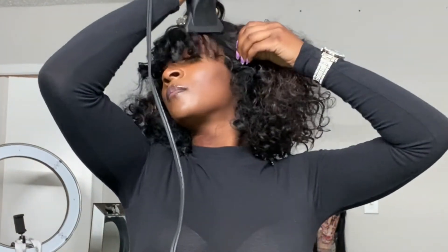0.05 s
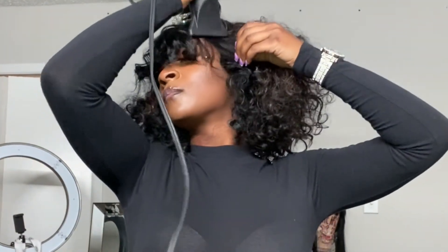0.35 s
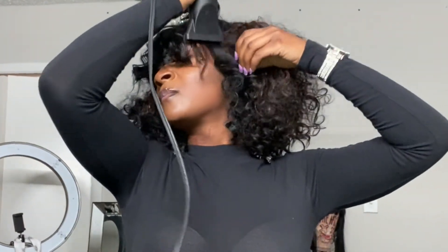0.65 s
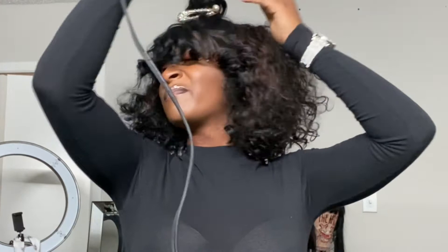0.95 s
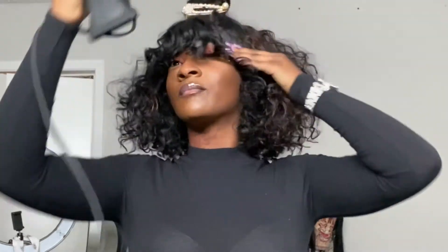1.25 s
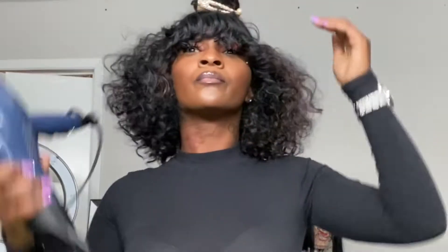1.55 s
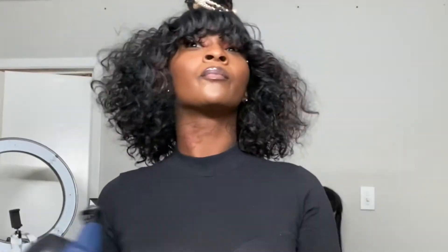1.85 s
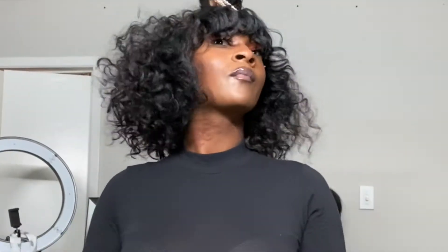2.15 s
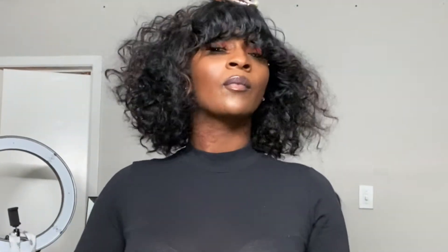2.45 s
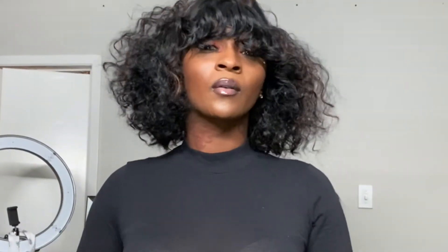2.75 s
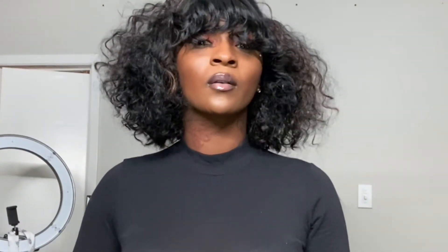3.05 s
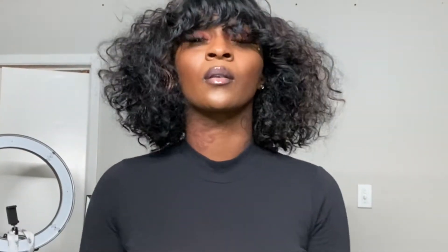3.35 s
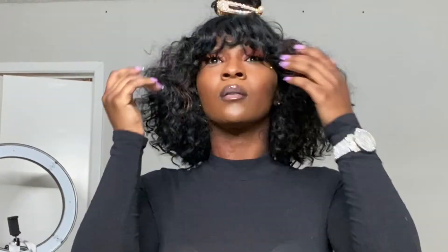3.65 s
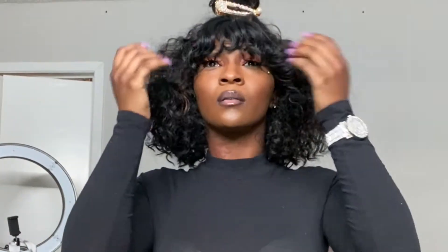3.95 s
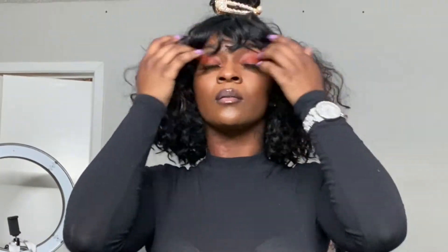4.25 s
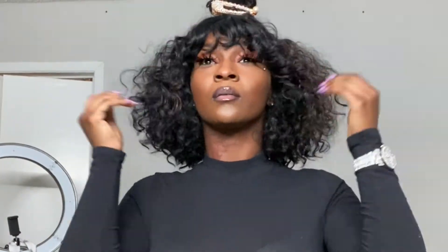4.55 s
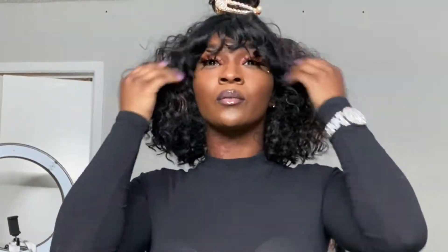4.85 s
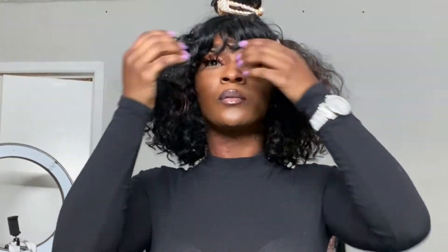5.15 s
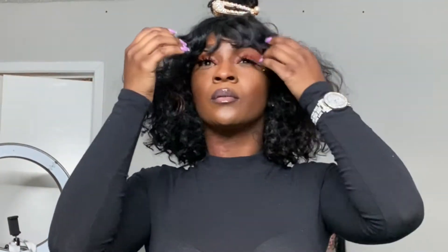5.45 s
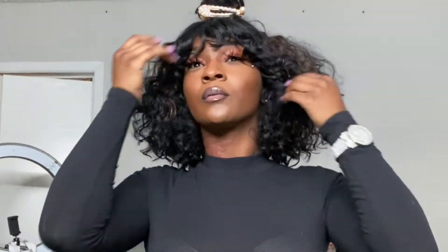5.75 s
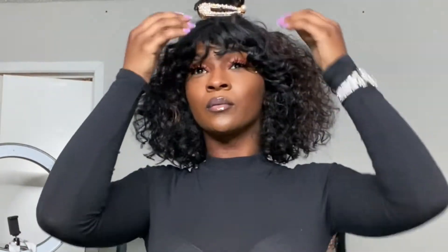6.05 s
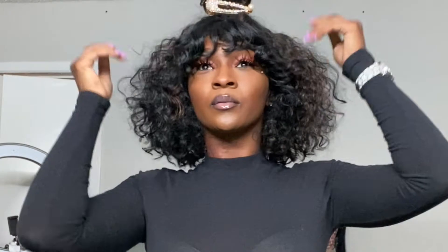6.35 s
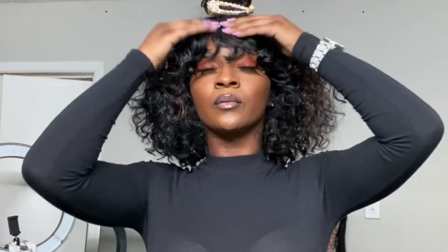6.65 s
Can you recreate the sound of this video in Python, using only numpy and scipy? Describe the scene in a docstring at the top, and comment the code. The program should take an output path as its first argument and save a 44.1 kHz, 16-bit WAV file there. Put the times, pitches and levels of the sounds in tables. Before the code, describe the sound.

In a small room, a nearby hair dryer runs with an airy roar and wavering whistling tones, changing colour as it moves off the hair. About halfway through, the motor has been switched off and its brief wind-down stops short. After that there is only a quiet, low hum, with occasional light clicks from nails and a watch and very soft brushing of hair and sleeve.

```python
"""A hand-held hair dryer blows on a wig in a small room, is lifted away, lowered and switched off.
Its turbulent jet, a broadband source, excites the resonances of barrel and nozzle under a thin
motor whine. Air drag brakes the fan, so its tones fall and the roar fades; then the sound breaks off.
A low room hum remains, with a few faint clicks and the friction noise of hands tidying the hair."""
import sys
import numpy as np
from scipy import signal
from scipy.fft import rfft, irfft, next_fast_len
from scipy.io import wavfile

SR = 44100
rng = np.random.default_rng(int(sys.argv[2]) if len(sys.argv) > 2 else 0)


def file_out(sig):
    """Save sig as 16-bit WAV at sys.argv[1]."""
    # one column per channel
    cols = np.atleast_2d(sig).T
    # limit, then scale
    lim = np.clip(cols, -1, 1)
    pcm = np.round(lim * 32767).astype(np.int16)
    wavfile.write(sys.argv[1], SR, pcm)


N = 305157
TIME = np.arange(N) / SR
SIZE = next_fast_len(N, real=True)
HZ = np.maximum(np.arange(SIZE // 2 + 1) * SR / SIZE, 1)
PORTS = np.array([[1], [-1]])  # sign of the left and right microphone port
OFF_S, BREAK_S = 2.771, 3.556  # the switch is released; the sound breaks off


def from_db(db):
    """Amplitude ratio of a level in decibels."""
    return 10 ** (np.asarray(db) / 20)


def rms_one(x):
    """Normalisation to unit mean power."""
    return x / np.sqrt(np.mean(x ** 2) + 1e-20)


def in_time(rows):
    """Linear interpolation of (time, value) rows."""
    return np.interp(TIME, *np.transpose(rows))


def over_hz(rows):
    """Interpolation over log frequency, one curve per column."""
    hz, *columns = np.transpose(rows)
    return [np.interp(np.log(HZ), np.log(np.maximum(hz, 1)), c) for c in columns]


def drift(rate):
    """Low-passed Gaussian noise of rms 1 that changes about rate times a second."""
    pole = np.exp(-80 * np.pi * rate / SR)
    white = rng.standard_normal(N // 40 + 2002)  # one value per 40 samples
    slow = signal.lfilter([1], [1, -2 * pole, pole * pole], white)[2000:]
    return np.interp(np.arange(N) / 40, np.arange(len(slow)), rms_one(slow))


def peak(hz, width_hz):
    """Lorentzian resonance curve of height 1."""
    return 1 / (1 + (2 * (HZ - hz) / width_hz) ** 2)


# likeness of the two ports: (frequency [Hz], correlation of near sounds, of the room's background)
CORRELATION = [(60, 0.8, 0.8), (170.3, 1, 0.96), (260, 0.45, 0.5), (376.3, 0.5, -0.22), (600, 0.55, -0.44),
               (1110, 0.72, -0.48), (1625, 0.55, -0.43), (2170, 0.68, 0), (4000, 0.51, 0.033),
               (5200, 0.13, 0.025), (6600, 0.55, 0.19), (8100, 0.91, 0.3), (15100, 1, 0.65)]
# level difference between the ports: (frequency [Hz], left minus right [dB])
BALANCE = [(200, 0.5), (430, -3.5), (850, 1.5), (1150, -2.5), (1600, 0), (4000, -1), (6300, -2.5),
           (7800, 0)]
# phase difference between the ports: (frequency [Hz], lead of the left [rad])
PHASE_LEAD = [(20, 0), (4600, 0), (5700, -1.7), (8100, 0), (15400, 9.4)]
def stereo_noise(diffuse=False):
    """Partial coherence: the spectrum of white noise as two spaced ports receive it."""
    mid, side = rng.standard_normal((2, 2 * len(HZ))).view(complex)
    alike = np.clip(over_hz(CORRELATION)[int(diffuse)], -1, 1)
    mid, side = np.sqrt(1 + alike) * mid, np.sqrt(1 - alike) * side
    left = from_db(.5 * over_hz(BALANCE)[0]) * np.exp(.5j * over_hz(PHASE_LEAD)[0])
    return np.array([(mid + side) * left, (mid - side) / left])


def coloured(gain, diffuse=False):
    """Spectral shaping: stereo noise of rms 1, weighted by a gain per frequency."""
    return rms_one(irfft(stereo_noise(diffuse) * gain)[:, :N])


def fan_speed(half_speed_s=.81):
    """Quadratic air drag: the share of full speed falls hyperbolically after switch-off."""
    return 1 / (1 + np.maximum(TIME - OFF_S, 0) / half_speed_s)


# strength of the stream at the microphone as the dryer is moved: (time [s], level [dB])
STREAM = [(0.05, -39), (0.68, -39.5), (0.74, -41.5), (1.13, -40.5), (1.4, -43), (1.66, -42.5), (1.8, -43),
          (2.02, -38.5), (2.2, -37.5), (2.45, -38.5), (2.7, -43)]
def flow_levels(rows, free):
    """Flow noise follows a power of fan speed; nozzle position and stream shift each row's level [dB]."""
    stream_db = in_time(STREAM)
    swing_db = stream_db - stream_db[TIME < OFF_S].mean()
    halvings = -np.log2(fan_speed())
    return [hair_db + free * (free_db - hair_db) + share * swing_db - loss_db * halvings
            for hair_db, free_db, share, loss_db in rows]


# the jet's roar, nozzle, rush, hiss and sizzle bands: (lower edge [Hz], upper edge [Hz])
JET_BANDS = [(300, 780), (780, 1250), (1250, 3200), (3200, 6500), (6500, 9500)]
# per band: (level on the hair [dB], level free [dB], share of stream swing, loss at half speed [dB])
JET_LEVELS = [(-40.5, -36.5, 0.16, 28), (-32.5, -34, .25, 36), (-37, -32.5, 1, 37.5),
              (-41.5, -41, 0.99, 38.5), (-46.5, -43.5, .85, 44)]
# spectrum of the turbulence: (frequency [Hz], relative level on the hair [dB], free [dB])
TURBULENCE = [(60.55, -26, -19), (129.3, -12.5, -8.5), (298, -11, -3.5), (412, -9.5, -8), (785, -15, -4),
              (1200.0, -11, -12), (1840, -2, -18.5), (2990, -9.5, -14), (4350, -8, -13.5),
              (5800, -12.5, -14.5), (7650, -16.5, -14), (9400, -17, -15.5), (10900, -27, -24.5),
              (13200, -21.5, -18.5), (14100, -28, -26)]
# resonances and hollows of barrel, heater and nozzle:
# (frequency [Hz], bandwidth [Hz], gain on the hair [dB], gain free [dB])
DUCT_MODES = [(357, 30, 9.5, 3.5), (469.6, 100, 4, 6.5), (551.5, 39, 10.5, 5), (649, 56, 9.5, 5),
              (835, 170, 5.5, 5), (965, 86, 6, 7.5), (1053, 82, 4, 6), (1256, 91, -5, 0),
              (1384, 120, 0, 8.5), (1525, 120, 3.5, 6), (1596, 140, 8.5, 8.5), (1730, 170, 4, 12),
              (1900, 130, -1.5, -1), (2035, 80, 1.5, 7.5), (2269, 260, 5.5, 11.5), (2430, 99, 6, 1.5),
              (2570, 120, 4.5, -0.5), (2857, 170, 10, 6), (3450, 130, 5, 1), (4688, 300, 3, 1.5),
              (4950, 160, -3, -2), (5700, 250, 0.5, 1)]
def jet(levels_db, free, flutter_db=1.16):
    """Source and filter: turbulence excites the duct, and hair at the nozzle reweights its resonances."""
    lowpasses = [1 / (1 + (HZ / edge) ** 12) for _, edge in JET_BANDS[:-1]]
    bandpasses = np.diff([0 * HZ, *lowpasses, 1 + 0 * HZ], axis=0)
    gains = [from_db(db + flutter_db * drift(8.1)) for db in levels_db]
    out = 0
    for pose, (slope_db, weight) in enumerate(zip(over_hz(TURBULENCE), (1 - free, free))):
        duct_db = sum(lifts[pose] * peak(hz, width) for hz, width, *lifts in DUCT_MODES)
        air = stereo_noise() * from_db(slope_db + duct_db)
        for (low, high), bandpass, gain in zip(JET_BANDS, bandpasses, gains):
            in_band = air.mean(axis=0)[(HZ > low) & (HZ < high)]
            band_rms = np.sqrt(2 * np.sum(np.abs(in_band) ** 2)) / SIZE
            out = out + np.sqrt(weight) * gain * irfft(air * bandpass)[:, :N] / band_rms
    return out


def wall_echoes(x, wall_db, decay_s, places):
    """Interference: wall reflections comb the spectrum, differently at each port and place passed."""
    t, spectrum, out = TIME[:SR // 6], rfft(x, SIZE), x
    passing_s = np.linspace(0, OFF_S, places)
    for place in np.eye(places):
        shared, own = rng.standard_normal(len(t)), rng.standard_normal((2, len(t)))
        echoes = (shared + .4 * own) * np.exp(-t / decay_s) * (t > .014)
        response = rms_one(echoes) / np.sqrt(len(t))  # unit energy
        nearness = np.sqrt(np.interp(TIME, passing_s, place))
        out = out + from_db(wall_db) * nearness * irfft(spectrum * rfft(response, SIZE))[:, :N]
    return out / np.hypot(1, from_db(wall_db))


def head_echo(x, echo_db, lag_s, sway):
    """A moving comb filter: the echo path off head and arm varies as the dryer is waved about."""
    waving = np.interp(TIME, [1.9, 2.3], [1, .3])
    lag = lag_s * (1 + sway * waving * drift(.99))
    echo = np.array([np.interp(TIME - lag, TIME, port) for port in x])
    return (x + from_db(echo_db) * echo) / np.hypot(1, from_db(echo_db))


def shaken_tone(phase, width_hz, hold):
    """Narrow-band noise by random quadrature modulation, rms 1; hold steadies its amplitude."""
    a, b = drift(width_hz), drift(width_hz)
    tone = a * np.cos(phase) + b * np.sin(phase)
    return rms_one(tone / (a * a + b * b + .1) ** (hold / 2))


# the barrel's strongest resonances: (frequency on the hair [Hz], frequency free [Hz], bandwidth [Hz],
# share of pitch lost at standstill, amplitude hold [0-1])
BARREL_MODES = [(357, 365, 22, 0, .3), (490, 476, 13, .11, .65), (555, 570, 22, 0, .4),
                (655, 620, 20, 0, .4), (1040, 975, 26, 0, .3), (1500, 1535, 28, 0, .3),
                (1605, 1615, 45, -.04, .25), (2355, 2280, 30, 0, .3), (2825, 2825, 52, 0, .3)]
# per mode: (level on the hair [dB], level free [dB], share of stream swing, loss at half speed [dB])
BARREL_LEVELS = [(-58.5, -58, .1, 9.5), (-54.5, -41, .1, 20.5), (-46, -43.5, .1, 30), (-52, -45, .1, 34),
                 (-46, -48, .1, 23), (-51, -45, 0.73, 40), (-52, -41.5, .8, 33), (-44.5, -42.5, .6, 42),
                 (-53.5, -65.5, .7, 35)]
# the stream catches or leaves the nearest mode: (time [s], half length [s], frequency [Hz], gain [dB])
FLARES = [(.02, .034, 1040, 12), (.15, .35, 2830, 9), (.12, .05, 555, 5), (.13, .05, 2350, 3),
          (.26, .06, 2350, -9), (.43, .04, 1040, 13), (.42, .06, 1610, 6), (.62, .07, 2350, 4),
          (.6, .12, 2830, 12), (.74, .07, 1610, 11), (.76, .05, 555, 5), (.85, .06, 655, 7),
          (.85, .09, 2350, 9), (.9, .06, 1500, 5), (1.16, .055, 1610, 19), (1.3, .1, 481, 6),
          (1.4, .12, 1040, 8), (1.4, .12, 2350, 4), (1.59, .07, 555, 8), (1.64, .03, 481, 5),
          (1.62, .07, 2350, 6), (1.68, .2, 1610, -5), (1.81, .07, 2350, -12), (1.88, .048, 481, 6),
          (2.0, .025, 481, -8), (2.24, .07, 1610, 7), (2.27, .03, 1040, 13), (2.42, .04, 481, 6),
          (2.5, .1, 2350, 3), (2.62, .06, 1500, 7), (2.7, .09, 481, 6), (2.88, .09, 555, 6),
          (2.88, .08, 481, 6), (3.0, .25, 357, 11), (3.048, .028, 481, 15), (3.06, .018, 1040, 15),
          (3.1, .13, 1610, 6), (3.17, .08, 481, 13)]
def barrel(free, waver_share=.008, waver_db=1.97, wavers_per_s=2.5):
    """Random forcing: turbulence drives each resonance as a narrow tone that wavers and flares."""
    slowed, levels_db = 1 - fan_speed(), flow_levels(BARREL_LEVELS, free)
    for s, half_s, hz, lift_db in FLARES:
        caught = np.argmin([abs(mode[0] - hz) for mode in BARREL_MODES])
        levels_db[caught] += lift_db * np.exp(-((TIME - s) / half_s) ** 2)
    out = 0
    for (hair_hz, free_hz, width_hz, sag, hold), db in zip(BARREL_MODES, levels_db):
        centre_hz = hair_hz + np.sqrt(free) * (free_hz - hair_hz)
        pitch_hz = centre_hz * (1 - sag * slowed + waver_share * drift(wavers_per_s))
        phase = 2 * np.pi * np.cumsum(pitch_hz) / SR
        mid, side = [shaken_tone(phase, width_hz, hold) for _ in range(2)]
        pan = from_db(.5 * PORTS * np.interp(free_hz, *np.transpose(BALANCE)))
        gain = from_db(db + waver_db * drift(wavers_per_s))
        out = out + pan * gain * (mid + .52 * side * PORTS)
    return out


# speed of the motor under power: (time [s], rotation rate [Hz])
ROTATION = [(0, 233), (.25, 231), (.7, 229), (.95, 225.4), (1.2, 224.2), (1.7, 224.4), (2.15, 226.4)]
# fan and commutator tones: (multiple of the rotation rate, level relative to the hiss band [dB])
MOTOR_TONES = [(1, -9), (2.5, -8), (6, -8), (7.5, -8), (9, -5.5), (10, -5.5), (13, -16), (15, -17),
               (16, -18), (20, -17), (21, -16), (24, -17), (30, -7.7)]
def motor_whine(hiss_db):
    """Rotation makes tones at multiples of its rate; phase modulation by the mains adds sidebands."""
    rate_hz = in_time(ROTATION) * fan_speed() * (1 + .0005 * drift(8))
    mains_shake = .046 * np.sin(2 * np.pi * 60 * TIME)
    angle = 2 * np.pi * np.cumsum(rate_hz) / SR + mains_shake
    out = 0
    for multiple, db in MOTOR_TONES:
        gain = from_db(db + 2.2 * drift(9))
        out = out + gain * np.sin(multiple * angle + .5 * drift(2) * PORTS)
    switch_off_db = np.interp(TIME - OFF_S, [0, .1], [0, -10])
    return out * from_db(hiss_db + switch_off_db)


# resonances of the motor housing: (frequency [Hz], bandwidth [Hz], relative level [dB])
HOUSING_MODES = [(2410, 130, 1), (3320, 160, 1.5), (3940, 120, 1.5), (4290, 90, -0.5), (5260, 130, 0.5)]
def motor_whirr(level_db=-52, half_speed_loss_db=20.5, throb=.6):
    """Amplitude-modulated friction: the motor's brushes scrape once a turn and ring the housing."""
    angle = 2 * np.pi * np.cumsum(in_time(ROTATION) * fan_speed()) / SR
    scrape = 1 + throb * np.cos(angle)
    housing = sum(from_db(db) * peak(hz, width_hz) for hz, width_hz, db in HOUSING_MODES)
    return from_db(level_db + half_speed_loss_db * np.log2(fan_speed())) * scrape * coloured(housing)


# path of the nozzle: (time [s], position [0 on the hair, 1 blowing freely])
NOZZLE_PATH = [(0, 0.033), (.7, .15), (1.1, 0.13), (1.47, 0.48), (1.6, .9), (2.3, 0.98)]
def dryer():
    """Superposition of jet, echoes, barrel, motor and handling, all ending in one brief fade."""
    free = in_time(NOZZLE_PATH)
    levels_db = flow_levels(JET_LEVELS, free)
    air = jet(levels_db, free)
    air = wall_echoes(air, wall_db=-3.5, decay_s=.04, places=5)
    air = head_echo(air, echo_db=-14.5, lag_s=.001599, sway=.13)
    handling = rustles() + shell_knock()
    running = np.clip((BREAK_S - TIME) / .019 + .5, 0, 1)
    return running * (air + barrel(free) + motor_whine(hiss_db=levels_db[-2]) + motor_whirr() + handling)


# spectra of the ventilation rumble and the faint hiss: (frequency [Hz], relative level [dB])
RUMBLE_SPECTRUM = [(12, -61.5), (20, -34.5), (37, -18), (59, 2.5), (86, -11), (122, -13), (192, -14.5),
                   (227, -16.5), (340, -24), (376, -19), (409, -26), (468, -31), (774, -31), (1100, -44),
                   (1430, -81.5), (2420, -120)]
HISS_SPECTRUM = [(800, 0), (1100, -0.5), (1500, 3.5), (2000, -9.5), (3000, -14), (6000, -21), (8500, -19.5),
                 (13000, -27), (16000, -27.5)]
# mains hum and other steady tones of the room: (frequency [Hz], level [dB])
HUM_TONES = [(28, -66), (59.5, -55), (119.8, -54.5), (262, -69), (376.8, -63.8), (383, -70), (554.5, -78),
             (651.4, -80), (753.7, -78.5), (872.1, -80)]
def room(rumble_db=-46.5, hiss_db=-75.5):
    """Background noise: continuous spectra of ventilation and hiss under a line spectrum of hum."""
    # fuller mids, and a hollow where the drone sits
    shape_db = 3 * peak(hz=700, width_hz=1000) - 10 * peak(hz=58.2, width_hz=15)
    rumble = coloured(from_db(over_hz(RUMBLE_SPECTRUM)[0] + shape_db) * (HZ < 1300), diffuse=True)
    hiss = coloured(from_db(over_hz(HISS_SPECTRUM)[0]) * (HZ > 900), diffuse=True)
    hum = 0
    for hz, db in HUM_TONES:
        amplitude = np.sqrt(2) * from_db(db + drift(2.6))
        hum = hum + amplitude * np.sin(2 * np.pi * hz * TIME + .13 * drift(1.3))
    return from_db(rumble_db) * rumble + from_db(hiss_db) * hiss + hum


# surges of the room's drone: (time [s], gain [dB])
SURGES = [(.92, 10), (2.12, 8.8), (4.03, 12), (4.73, 15.4), (5.5, 13), (6.27, 6)]
def drone(hz=56.7, base_db=-53.5, surge_s=.064):
    """Slow amplitude and phase modulation: a low tone wavers and now and then surges."""
    surge_db = sum(lift_db * np.exp(-((TIME - s) / surge_s) ** 2) for s, lift_db in SURGES)
    level_db = base_db + .5 * drift(5.6) + surge_db
    return np.sqrt(2) * from_db(level_db) * np.sin(2 * np.pi * hz * TIME + .62 * drift(2.5))


def touches(rows, spectrum, tail_db, tail_t60):
    """Incoherent bursts of tiny slips add in power; each swells, decays and leaves a short room tail."""
    power = np.zeros(N)
    for s, db, swell_s, t60 in rows:
        near = np.abs(TIME - s) < .5
        before, after = np.maximum(s - TIME[near], 0), np.maximum(TIME[near] - s, 0)
        decay = from_db(-60 * after / t60) ** 2 + from_db(tail_db - 60 * after / tail_t60) ** 2
        power[near] += from_db(db) ** 2 * np.exp(-(before / swell_s) ** 2) * decay
    grain = from_db(1.5 * drift(300))
    return np.sqrt(power) * grain * coloured(from_db(over_hz(spectrum)[0]))


# rustles of the dryer: (time [s], level [dB], rise [s], T60 [s])
RUSTLES = [(3.27, -66, .03, 0.22), (3.35, -59, 0.02, 0.3), (3.465, -60.5, 0.026, 0.19),
           (3.54, -65, 0.014, 0.13)]
# spectrum of light rubbing: (frequency [Hz], relative level [dB])
FRICTION_SPECTRUM = [(500, -24), (2000, -10), (5000, -5), (8500, -2), (13500, -9), (16000, -13)]
def rustles():
    """Sliding friction makes bright noise as the dryer is laid down."""
    return touches(RUSTLES, FRICTION_SPECTRUM, tail_db=-17, tail_t60=.3)


# knock of the shell: (time [s], level [dB], rise [s], T60 [s])
KNOCKS = [(3.403, -58, .005, 0.069)]
# its spectrum: (frequency [Hz], relative level [dB])
KNOCK_SPECTRUM = [(400, -12), (1000, -5), (1400, -9), (2400, 1), (3300, -13), (8000, -28)]
def shell_knock():
    """A light impact in the hand excites the damped resonances of the plastic shell."""
    return touches(KNOCKS, KNOCK_SPECTRUM, tail_db=-20, tail_t60=.2)


# clicks of fingernails and watch: (time [s], level [dB], rise [s], T60 [s])
CLICKS = [(3.734, -69.5, .005, 0.19), (4.772, -78, .002, .03), (5.6385, -56.5, 0.0028, .032),
          (5.65, -70, .002, .04), (6.759, -75, .002, 0.038), (6.789, -54, 0.004, 0.055),
          (6.798, -60, .0015, 0.05)]
# their spectrum: (frequency [Hz], relative level [dB])
CLICK_SPECTRUM = [(250, -7), (600, 3), (1050, 0), (1700, 1.5), (2600, 0), (4000, -1), (6300, -0.5),
                  (8000, -9.5), (12000, -7), (16000, -22)]
def clicks():
    """Brief, hard contacts of fingernails and watch radiate broadband transients."""
    return touches(CLICKS, CLICK_SPECTRUM, tail_db=-23.5, tail_t60=.18)


# strokes of the hands: (time [s], level [dB], rise [s], T60 [s])
STROKES = [(3.99, -86, .02, .5), (4.195, -84, 0.016, .15), (6.627, -69.5, 0.004, 0.19)]
def hand_strokes():
    """Friction of hands on hair and sleeve makes faint bursts of hiss."""
    return touches(STROKES, FRICTION_SPECTRUM, tail_db=-16, tail_t60=.4)


# swish of a sleeve: (time [s], level [dB], rise [s], T60 [s])
SWISHES = [(6.19, -81, 0.046, .25)]
# its spectrum: (frequency [Hz], relative level [dB])
SWISH_SPECTRUM = [(1000, -25), (1700, -4), (2050, 2), (2500, -20), (9000, -24), (16000, -32)]
def sleeve_swish():
    """Friction of cloth makes a soft band of noise near 2 kHz."""
    return touches(SWISHES, SWISH_SPECTRUM, tail_db=-15, tail_t60=.3)


def scene():
    """Superposition of hands, dryer and room; everything dips briefly near 3.56 s."""
    hands = clicks() + hand_strokes() + sleeve_swish()
    dip_db = np.interp(TIME, [3.548, 3.57, 3.585, 3.6], [0, -17, -6, 0])
    return (dryer() + hands + room() + drone()) * from_db(dip_db)


def record(dry):
    """Band limiting: an elliptic low-pass cuts steeply above 15 kHz."""
    return signal.sosfilt(signal.ellip(10, .3, 80, 15000, fs=SR, output="sos"), dry)


dry = scene()
out = record(dry)
file_out(out)
```